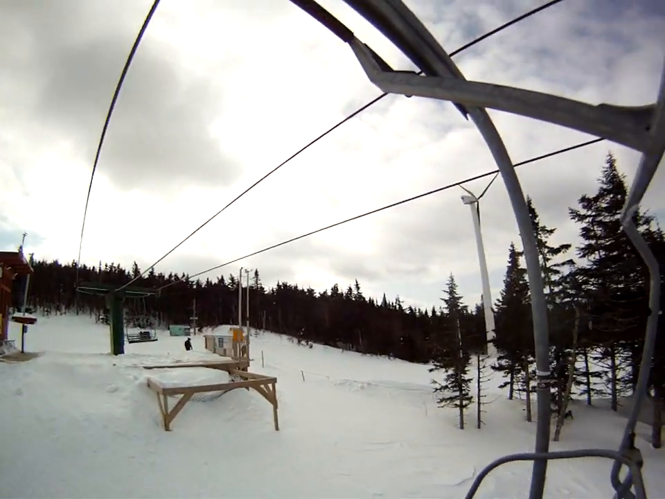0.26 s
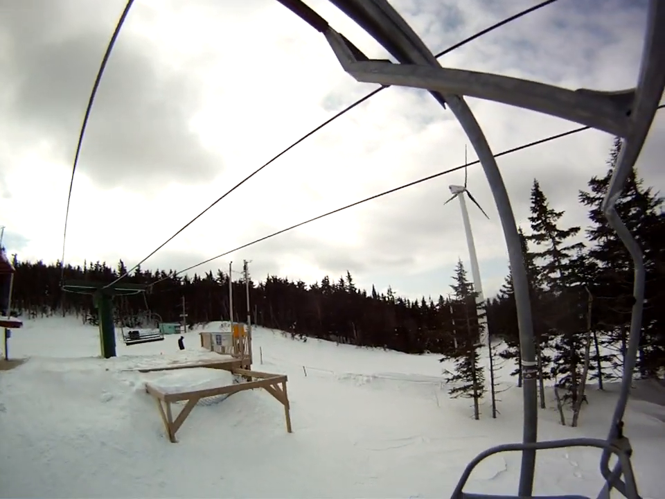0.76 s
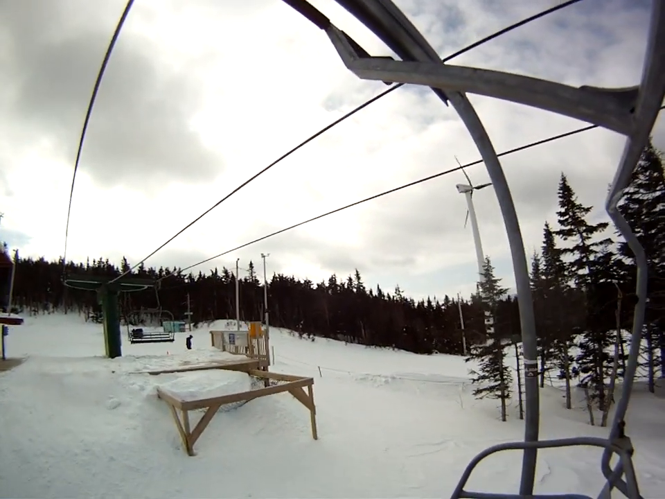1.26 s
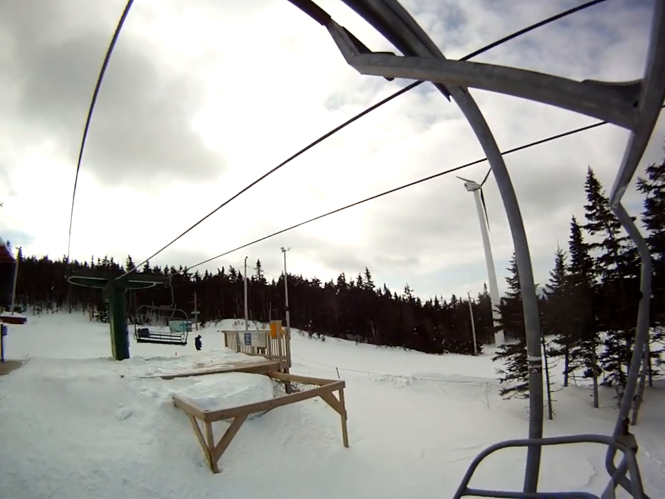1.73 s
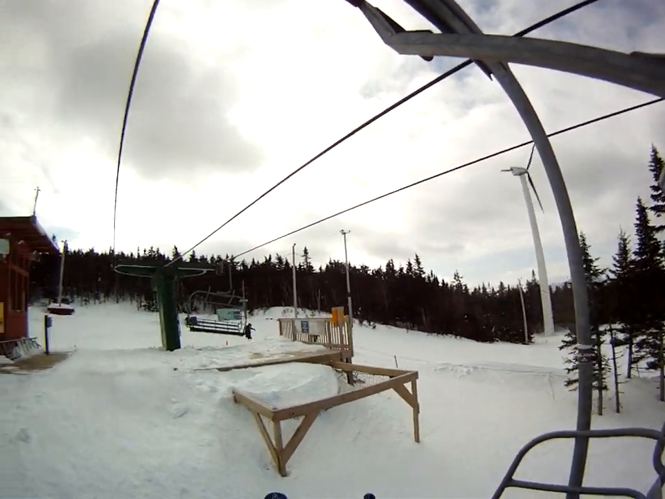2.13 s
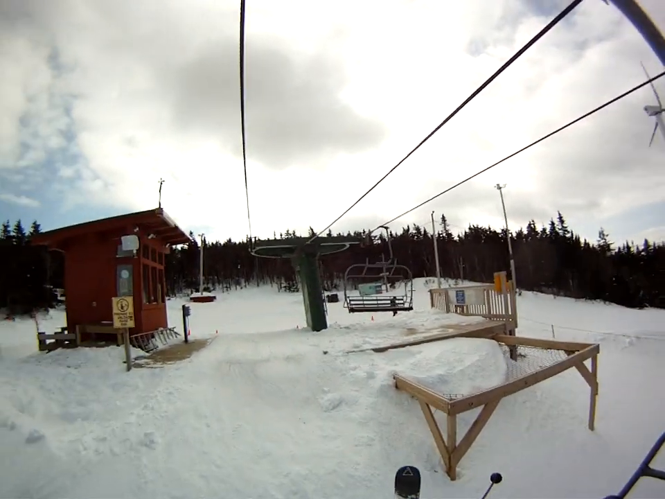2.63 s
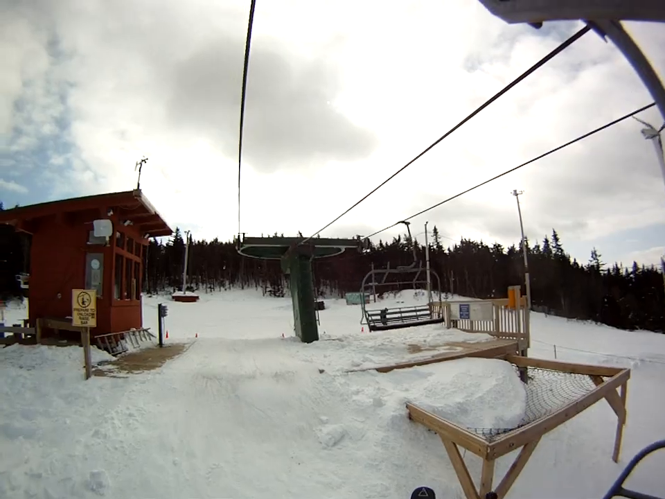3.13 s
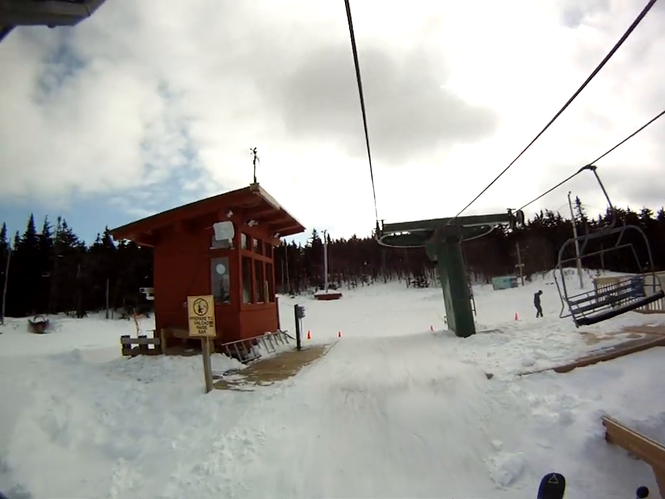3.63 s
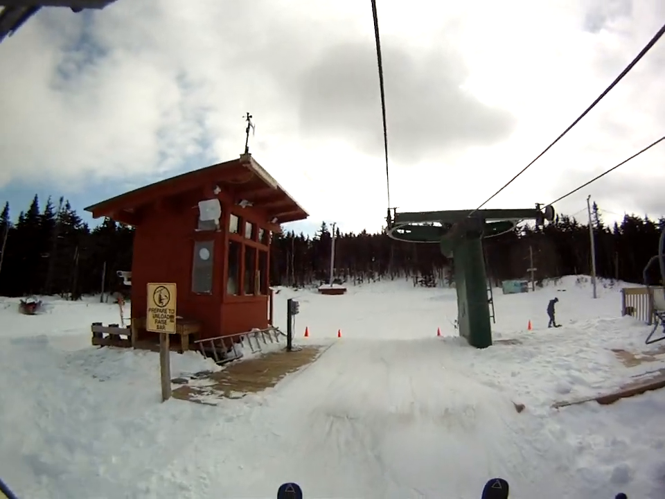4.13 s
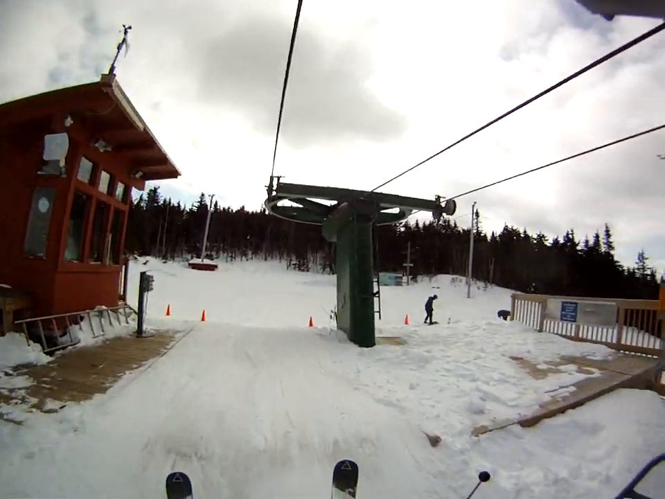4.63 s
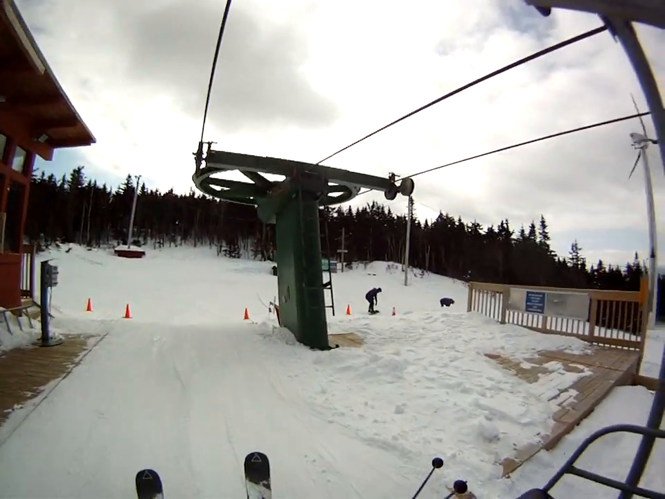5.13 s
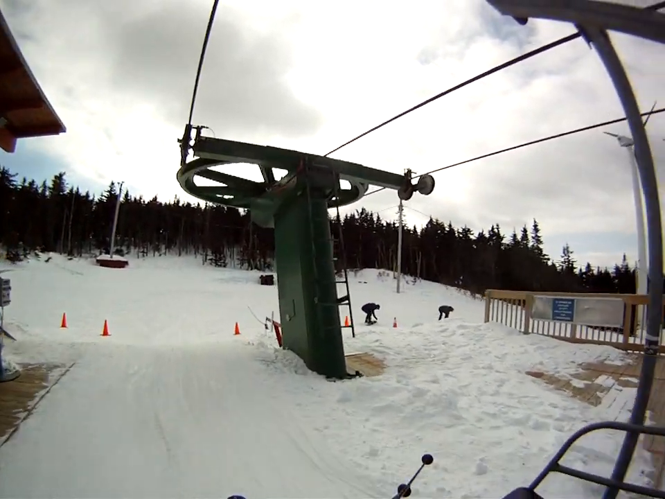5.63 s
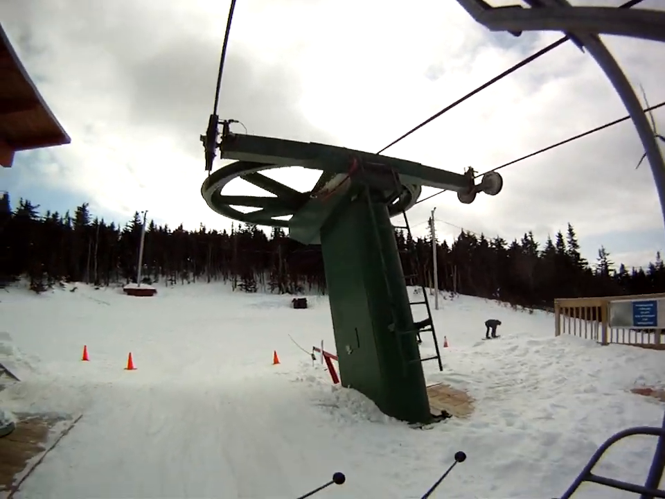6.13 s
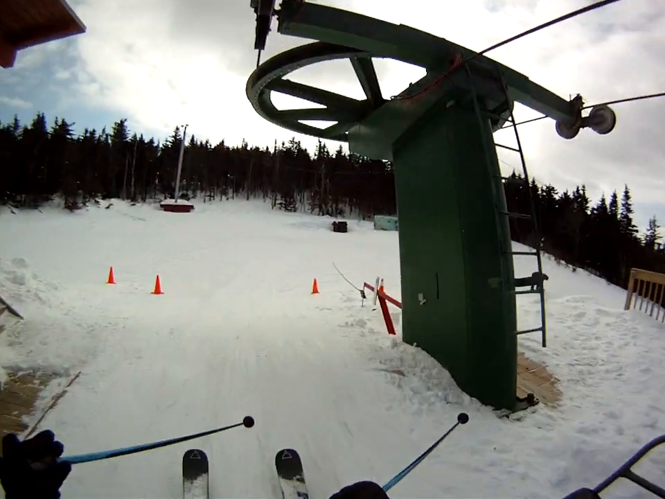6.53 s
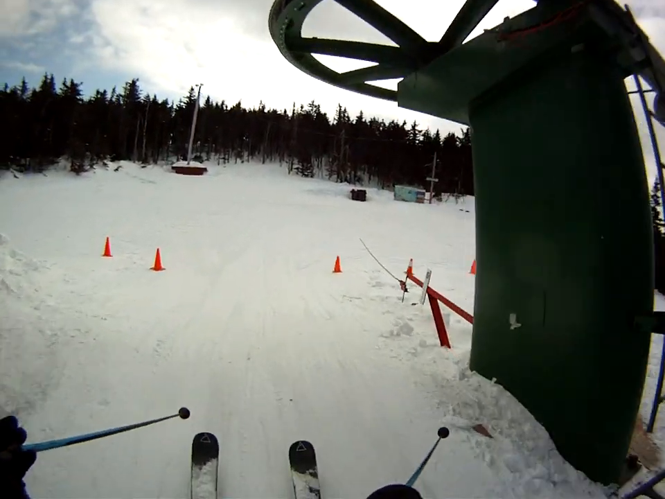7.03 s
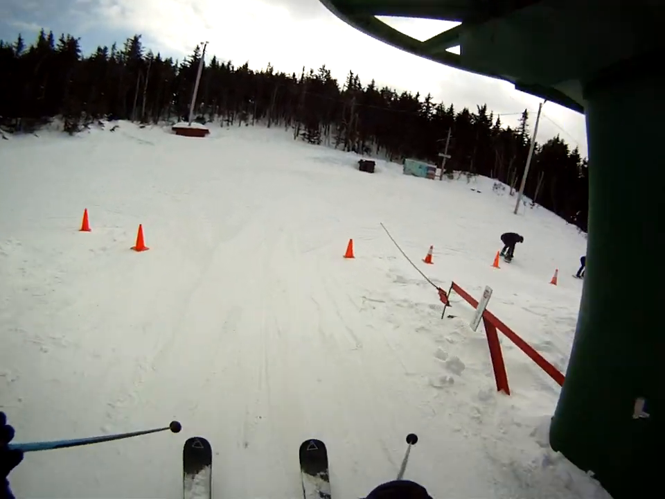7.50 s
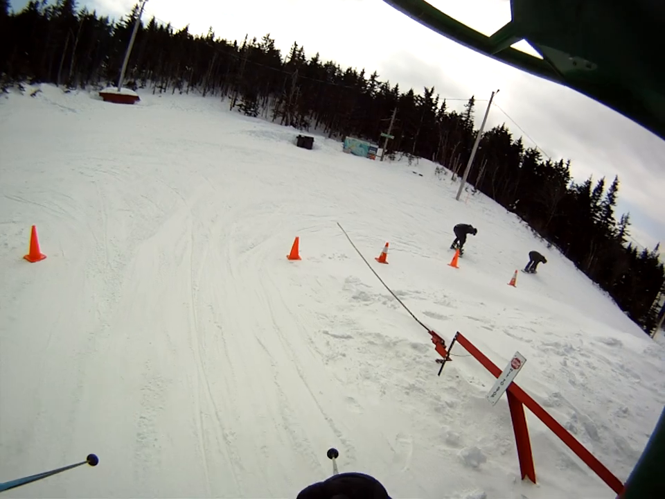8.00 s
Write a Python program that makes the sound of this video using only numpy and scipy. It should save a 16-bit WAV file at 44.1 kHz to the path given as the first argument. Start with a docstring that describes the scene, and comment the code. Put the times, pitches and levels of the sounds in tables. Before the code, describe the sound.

A chairlift hums low and unsteadily while loose steel rattles, rings and clacks, then skis crunch and scrape onto packed snow at the top.

```python
"""A low rope hum and rubbing clothing are heard first: a chair rides its haul rope to the top station.
Loose steel rattles and rings as damped modes excited by brief contacts; dry clacks and dull bumps fall between.
Towards the end skis crunch on packed snow: noise bursts around sinking pitches.
A helmet microphone in a closed housing hears it over wind and self-noise. Its recorder samples at 12 kHz
and holds each value, which mirrors every sound about 6 and 12 kHz."""
import sys
import numpy as np
from scipy import signal
from scipy.fft import rfft, irfft, next_fast_len
from scipy.io import wavfile

SR = 44100
rng = np.random.default_rng(int(sys.argv[2]) if len(sys.argv) > 2 else 0)


def materialize(psi):
    """Save the field psi as 16-bit PCM at rate SR to the path in sys.argv[1].

    A 1-D psi becomes a single channel; in a 2-D psi each row is a channel.
    """
    bounded = np.clip(np.atleast_2d(psi).T, -1, 1)
    quanta = np.round(bounded * 32767).astype(np.int16)
    wavfile.write(sys.argv[1], SR, quanta)


N = 364254


def amp(db):
    """Logarithmic level: decibels to amplitude gain."""
    return 10 ** (np.asarray(db) / 20)


def rms_one(x):
    """Power normalisation: scale to unit rms."""
    return x / np.sqrt(np.mean(x ** 2) + 1e-20)


def in_time(rows):
    """Linear interpolation: each column of a curve table at every sample."""
    s, *columns = np.transpose(rows)
    return [np.interp(np.arange(N) / SR, s, column) for column in columns]


def colour(x, points):
    """Spectral shaping: weight x by levels interpolated over log frequency."""
    size = next_fast_len(len(x))
    hz, db = np.transpose(points)
    gain = amp(np.interp(np.log(np.fft.rfftfreq(size, 1 / SR) + 1), np.log(hz), db))
    return irfft(rfft(x, size) * gain, size)[:len(x)]


def drift(rate_hz):
    """Low-passed noise: a slow random signal of unit rms, computed at every 40th sample."""
    pole = np.exp(-80 * np.pi * rate_hz / SR)
    noise = rng.standard_normal(N // 40 + 2002)
    slow = signal.lfilter([1], [1, -2 * pole, pole * pole], noise)[2000:]  # settled part
    return np.interp(np.arange(N) / 40, np.arange(len(slow)), rms_one(slow))


def ring(clicks, hz, t60):
    """Damped resonance: a unit click starts a decaying sine of height 1; t60 in s."""
    radius = amp(-60 / (t60 * SR))
    angle = 2 * np.pi * hz / SR
    feedback = [1, -2 * radius * np.cos(angle), radius * radius]
    return signal.lfilter([0, np.sin(angle)], feedback, clicks + 1e-18)


def burst(ms, hiss):
    """Impulsive envelope t exp(-t): the input swells to a maximum at ms, then dies."""
    t = np.arange(len(hiss)) / SR * 1000 / ms
    return hiss * t * np.exp(-t)


def lay(out, s, sound, db):
    """Superposition: a copy of the track with a sound of peak db added at s."""
    track, at = out.copy(), round(s * SR)
    track[at:at + len(sound)] += (amp(db) * sound / np.abs(sound).max())[:N - at]
    return track


# hum reaching the helmet through seat and rider; it drops away as the rider stands up:
# [t/s, 1st partial level/dB, 2nd partial level/dB, 3rd partial level/dB]
HUM_LEVELS = [(0.0, -43, -47, -68), (0.3, -39.5, -52.5, -63), (0.62, -46.5, -64, -77),
              (1.0, -47.5, -50, -79), (1.25, -53, -63, -82), (1.36, -47.5, -55, -70),
              (1.94, -48.5, -51.5, -75), (2.06, -66, -61.5, -77), (2.22, -48.5, -54.5, -80),
              (2.75, -64, -61.5, -90), (3.05, -48, -56.5, -69), (3.92, -43, -52.5, -71),
              (4.08, -63, -59.5, -77), (4.26, -50.5, -47, -67), (4.44, -53.5, -65, -70.5),
              (4.75, -48, -52.5, -63), (5.02, -56, -57, -81), (5.27, -47, -49.5, -82),
              (5.56, -56, -69, -80), (5.82, -47.5, -50, -76), (6.32, -49.5, -48, -74),
              (6.47, -82, -60, -80), (7.45, -66, -70, -65.5), (7.72, -50, -66, -77), (7.82, -66, -50, -70),
              (8.26, -82, -77, -90)]
STRAND_HZ = 48.97   # mean rate of the rope strands running over the wheels


def rope_hum(waver=0.0131, flutter_db=2.5, upper_rough=0.68):
    """Harmonic excitation by strands: the first partial flutters, the upper two throb by random modulation."""
    phase = 2 * np.pi * np.cumsum(STRAND_HZ * (1 + waver * drift(7.67))) / SR
    hum = 0
    for k, db in enumerate(in_time(HUM_LEVELS)):
        if k:
            # seat and hanger shake out of step
            shake = 1 + upper_rough * (drift(7.6) + 1j * drift(7.9))
        else:
            shake = amp(flutter_db * drift(4.9))
        shake = shake / np.sqrt(np.mean(np.abs(shake) ** 2))
        carrier = np.exp(1j * ((k + 1) * phase + rng.uniform(0, 2 * np.pi)))
        hum = hum + np.sqrt(2) * amp(db) * np.real(shake * carrier)
    return hum


# steel on steel, blow strength before the gain and modes of the frame:
# [t/s, level near 3.4 kHz/dB, near 2 kHz relative to it/dB, near 2.7 kHz relative to it/dB]
STEEL_CONTACTS = [(0.2259, -57, -18, 1), (0.2693, -60, -2, -2), (0.2994, -66.5, 13.5, -10),
                  (0.433, -61, -2, -7), (0.4894, -67, 7, -7), (0.6814, -59.5, 3, 4.5), (0.8106, -61, 4, -4),
                  (0.9732, -59, 6.5, -4), (1.148, -63, 2, -19), (1.3144, -52, 2.5, -7),
                  (1.4483, -65, 2, -15), (1.4744, -60, 2, -4), (1.576, -58, 2, -1), (2.4159, -54, -17, 1),
                  (2.5711, -53, -6, -14), (3.3507, -70, -17, 5), (3.4313, -55.5, -9, 3.5),
                  (4.0941, -61, -16, -10), (4.132, -58, -15, -16), (4.5459, -56, -2, -16),
                  (4.7311, -50, 1, -14), (4.8993, -56.5, 0, -14), (4.9192, -57.5, -1, 2),
                  (5.4849, -63.5, 5.5, -11), (5.6221, -57, -4, 0), (5.662, -56, -12, -17),
                  (5.68, -48, -5, -2), (5.6999, -50, 0, -4), (5.7621, -45, -13, 0.5),
                  (5.8047, -59, -25, -13), (5.8873, -53, -3, 7.5), (5.9253, -52, -11, 2.5),
                  (5.9463, -54.5, -9, 5), (6.0453, -61, 6, -4), (6.2411, -60, 4.5, 4),
                  (6.3839, -45.5, 0.5, -3), (6.4014, -46, -3, 3), (6.4402, -45.5, 5, -9),
                  (6.5795, -57, 4, 2), (6.5984, -48, -1, -1.5), (6.6245, -53.5, -4, -10),
                  (6.6844, -53.5, -15, -24), (7.0115, -54, -1.5, -7), (7.3435, -47, -17, -5),
                  (7.5368, -44, -5, -0.5), (7.6774, -53, 4, -1), (7.9723, -40, -17, 0),
                  (8.2224, -47, 1.5, 5)]
FAINT_RATTLE_DB, FAINT_SPREAD_DB = -63, 6   # mean and standard deviation of the faint blows


def contacts(count=10):
    """Random arrivals: the clear rattles joined by small contacts at chance moments."""
    when, u = rng.random(count), rng.standard_normal((count, 3))
    level = FAINT_RATTLE_DB + FAINT_SPREAD_DB * u[:, 0]
    faint = np.column_stack([when * (N / SR - .1), level, 6 * u[:, 1] - 4, 5 * u[:, 2] - 8])
    return np.vstack([STEEL_CONTACTS, faint])


# modes of the chair frame: [f/Hz, level/dB before the layer gain, t60/s]
FRAME_MODES = [(934, -5, 0.057), (1227, -12, 0.18), (1500, 3.5, 0.13), (1652, 6, 0.027), (1989, 5, .27),
               (2056, -8.5, 0.43), (2250, 0, 0.3), (2360, -1.5, 0.089), (2547, -7.5, 0.56),
               (2710, -0.5, 0.32), (2840, -20, 0.12), (3240, 2, 0.09), (3506, 8, 0.056), (3980, -1, 0.035),
               (4760, -13, 0.12)]


def rattles(hits, gain_db=-6, contact_ms=0.53, chance_db=2.0):
    """Modal excitation: a brief contact force feeds each mode by where it lands on the frame."""
    out, size = np.zeros(N), 800
    luck = rng.standard_normal((len(hits), len(FRAME_MODES)))
    turn = rng.uniform(0, 2 * np.pi, luck.shape)
    push = burst(contact_ms, np.ones(size))
    t = np.arange(size) / SR
    for k, (hz, mode_db, t60) in enumerate(FRAME_MODES):
        blows = np.zeros(N + size)
        for (s, db, low_db, mid_db), u, phase in zip(hits, luck[:, k], turn[:, k]):
            at = round(s * SR)
            # the part of the chattering force that lies on this mode
            force = 2 * push / push.sum() * np.cos(2 * np.pi * hz * t + phase)
            place_db = np.interp(hz, [1700, 1980, 2500, 2750, 3100], [-6, low_db, mid_db, mid_db, 0])
            blows[at:at + size] += force * amp(db + place_db + chance_db * u)
        out += amp(gain_db + mode_db) * ring(blows[:N], hz, t60)
    return out


# broad spectrum shared by clatter, clacks, crunches and rubbing: [f/Hz, relative level per Hz/dB]
CONTACT_SPECTRUM = [(350, -93), (600, -16), (741, -25), (897, -7.5), (1010, -8), (1850, 1.5), (2250, 4),
                    (2540, -1), (3550, -2), (5900, -15), (7670, -67), (13000, -120)]


def clatter(hits, gain_db=-8, ms=22.0):
    """Broadband impact noise: each rattle also throws off a rough burst as the loose parts settle."""
    out = np.zeros(N)
    for (s, db, *_), hiss in zip(hits, rng.standard_normal((len(hits), 2500))):
        out = lay(out, s, colour(burst(ms, hiss), CONTACT_SPECTRUM), db + gain_db)
    return out


# dry clacks close by: [t/s, peak level/dB]
CLOSE_CLACKS = [(0.322, -51), (0.5655, -40.5), (0.7047, -43.5), (0.8085, -47.5), (0.9732, -59), (1.92, -49),
                (1.948, -50.5), (2.0323, -43), (3.3485, -51), (4.524, -46.5), (4.5444, -45.5),
                (5.5543, -40.5), (7.4396, -35)]


def clacks(ms=3.5):
    """Non-resonant impact: short broad noise bursts with no ring."""
    out = np.zeros(N)
    for (s, db), hiss in zip(CLOSE_CLACKS, rng.standard_normal((len(CLOSE_CLACKS), 1500))):
        out = lay(out, s, colour(burst(ms, hiss), CONTACT_SPECTRUM), db)
    return out


# skis touching down on packed snow:
# [t/s, peak level/dB, starting f/Hz, treble crackle relative level/dB]
SNOW_CRUNCHES = [(6.7337, -50.5, 3050, -2), (7.143, -44, 3120, -2), (7.3225, -41.5, 2240, -3),
                 (7.3433, -37.5, 3024, -2), (7.441, -39, 2036, -29), (7.516, -41, 2300, -3),
                 (7.5974, -42, 3500, -2), (7.633, -32, 3450, -26), (7.6779, -41, 2070, -8),
                 (7.7442, -39, 4525, -14), (7.8376, -34.5, 2440, -28), (7.8974, -40, 2346, -14),
                 (7.9611, -38, 2250, -18), (7.971, -38.5, 2660, -33), (8.034, -49, 1940, 0),
                 (8.0825, -36, 3310, -31), (8.1122, -33, 2480, -19), (8.1295, -33, 3530, -23),
                 (8.162, -43, 2340, -26), (8.206, -40, 2360, -30), (8.2235, -41, 2380, -28)]
# small crunches while the skis slide: start, mean peak level, pitch range
GRIT_FROM_S, GRIT_DB, GRIT_LOW_HZ, GRIT_HIGH_HZ = 7.5, -49.5, 1506, 3530


def grit(count=40):
    """Random arrivals: the clear crunches joined by small ones at chance moments."""
    u = rng.random((count, 3))
    when = GRIT_FROM_S + u[:, 0] * (N / SR - GRIT_FROM_S - .01)
    level = GRIT_DB + 8 * (u[:, 1] - .5)
    hz = GRIT_LOW_HZ * (GRIT_HIGH_HZ / GRIT_LOW_HZ) ** u[:, 2]
    small = np.column_stack([when, level, hz, np.full(count, -15)])
    return np.vstack([SNOW_CRUNCHES, small])


# decay time in cycles of the starting pitch, and share by which the pitch sinks in that time
CRUNCH_CYCLES, CRUNCH_FALL = 62, .04


def crunches(width_hz=150, broad_db=-13):
    """Narrow-band noise on a carrier that sinks as the snow packs down, with broad and treble crackle."""
    out, t = np.zeros(N), np.arange(3000) / SR
    treble = signal.butter(2, [3800, 5600], "band", fs=SR, output="sos")
    narrow = signal.butter(2, width_hz, fs=SR, output="sos")
    rows = grit()
    for (s, db, hz, top_db), (a, b, c, d) in zip(rows, rng.standard_normal((len(rows), 4, 3000))):
        age = t * 1000 / (1000 * CRUNCH_CYCLES / hz)   # in decay times
        phase = 2 * np.pi * np.cumsum(hz * (1 - CRUNCH_FALL * np.minimum(age, 1.5))) / SR
        a, b = signal.sosfilt(narrow, [a, b])
        grain = rms_one(a * np.cos(phase) + b * np.sin(phase))
        grain = grain + amp(broad_db) * rms_one(colour(c, CONTACT_SPECTRUM))
        grain = grain + amp(top_db) * rms_one(signal.sosfilt(treble, d))
        # sudden collapse, then a rounded-off grind
        envelope = np.minimum(t / 0.002, 1) * np.exp(-age ** 2)
        out = lay(out, s, grain * envelope, db)
    return out


# clothing and skis drag in strokes:
# [start t/s, end t/s, level/dB, body near 1.1 kHz relative to it/dB]
DRAG_STROKES = [(-0.2, 0.343, -61, -13), (1.964, 2.072, -60, -8), (2.14, 2.64, -59.5, -10.5),
                (3.37, 3.573, -62.5, -8), (4.553, 5.093, -65, -12), (5.58, 6.09, -64, -20),
                (6.32, 7.044, -62, -19), (7.226, 7.616, -59.5, -22), (7.633, 7.985, -53.5, -20),
                (8.003, 8.3, -59, -28)]
STROKE_RISE_S, STROKE_FALL_S, RUB_REST_DB = 0.097, 0.1, -68.5


def strokes():
    """Power addition: strokes swell, hold and die; the direct rubbing also keeps a resting murmur."""
    t = np.arange(N) / SR
    power = 0
    for start, end, db, body_db in DRAG_STROKES:
        rise = 1 + np.exp(4 * (start - t) / STROKE_RISE_S)
        fall = 1 + np.exp(4 * (t - end) / STROKE_FALL_S)
        power = power + amp(2 * np.array([[db], [db + body_db]])) / rise / fall
    return np.sqrt(power[0] + amp(2 * RUB_REST_DB)), np.sqrt(power[1])


BODY_LOW_HZ, BODY_HIGH_HZ = 800, 1620


def rubbing(per_s=3000, uneven_db=-2.5, frame_db=-6):
    """Stick-slip friction as dense uneven ticks, heard directly and through the frame's modes."""
    sizes = amp(uneven_db * np.minimum(rng.exponential(1, N), 5)) * rng.choice([-1, 1], N)
    ticks = sizes * (rng.random(N) < per_s / SR) * amp(0.56 * drift(31))
    level, body = strokes()
    body_band = signal.butter(2, [BODY_LOW_HZ, BODY_HIGH_HZ], "band", fs=SR, output="sos")
    low = signal.sosfilt(body_band, ticks)
    through = sum(amp(db) * ring(ticks * level, hz, t60) for hz, db, t60 in FRAME_MODES)
    through = amp(frame_db) * rms_one(through) * np.sqrt(np.mean(level ** 2))
    direct = colour(ticks, CONTACT_SPECTRUM)
    return level * rms_one(direct) + body * rms_one(low) + through


# dull bumps on the housing: [t/s, push level/dB before filter and modes]
HOUSING_BUMPS = [(3.348, -42), (3.402, -38), (3.441, -52), (5.74, -43.5), (5.935, -44), (5.975, -39.5),
                 (6.115, -45), (6.309, -42.5), (6.346, -46), (6.4, -47), (7.787, -50.5)]
# modes of the microphone housing: [f/Hz, level/dB, t60/s]
HOUSING_MODES = [(107, 3.5, 0.1), (193, -2.5, 0.026), (255, -12.5, 0.056)]


def bumps():
    """Low-passed impulse excitation: soft pushes ring low, quickly damped modes of the housing."""
    pushes = np.zeros(N)
    for s, db in HOUSING_BUMPS:
        pushes[round(s * SR)] = amp(db)
    pushes = signal.sosfilt(signal.butter(3, 370, fs=SR, output="sos"), pushes + 1e-18)
    return sum(amp(db) * ring(pushes, hz, t60) for hz, db, t60 in HOUSING_MODES)


# wind and self-noise: [f/Hz, relative level per Hz/dB]
AIR_SPECTRUM = [(12, -21), (20, 3), (103, -7), (187, -12), (546, -19), (1010, -22.5), (1420, -17.5),
                (1800, -28.5), (2020, -20.5), (2960, -26.5), (3500, -28), (5120, -27.5), (5900, -34),
                (7670, -80), (13000, -120)]
AIR_DB = -60   # rms level


def air():
    """Amplitude-modulated noise: a bass-heavy spectrum whose level gusts gently as a whole."""
    gusts = rng.standard_normal(N) * amp(0.62 * drift(5.9))
    return amp(AIR_DB) * rms_one(colour(gusts, AIR_SPECTRUM))


WIDTH_DB = -81   # rms level


def width_hiss():
    """Opposed polarity: a faint hiss enters the two channels with opposite signs."""
    spectrum = [(100, -27), (350, -1.5), (900, -8), (4500, -7), (5200, -1.0), (6000, -23.5)]   # f/Hz, level/dB
    side = colour(rng.standard_normal(N), spectrum)
    return amp(WIDTH_DB) * rms_one(side) * [[1], [-1]]


def scene():
    """Superposition: one microphone feeds both channels, which differ only by a faint hiss."""
    hits = contacts()
    steel = rattles(hits) + clatter(hits) + clacks()
    mono = rope_hum() + steel + crunches() + rubbing() + bumps() + air()
    return mono + width_hiss()


CUTOFF_HZ = 15740


def record(dry):
    """Sample-and-hold imaging: 12 kHz values held four steps of 48 kHz, resampled to SR, the top cut."""
    sampled = signal.resample_poly(dry, 40, 147, axis=1)
    held = np.repeat(sampled, 4, axis=1)
    out = signal.resample_poly(held, 147, 160, axis=1)[:, 1:N + 1]
    return signal.sosfilt(signal.cheby2(14, 60, CUTOFF_HZ, fs=SR, output="sos"), out)


dry = scene()
out = record(dry)
materialize(out)
```